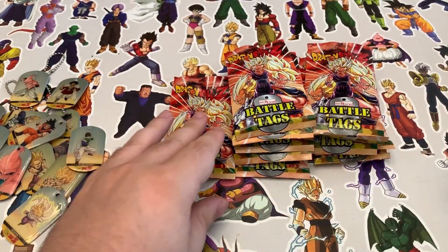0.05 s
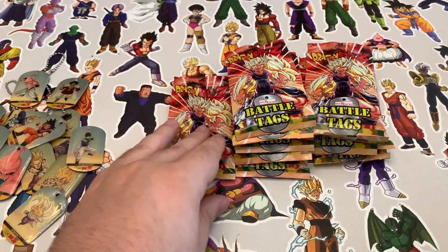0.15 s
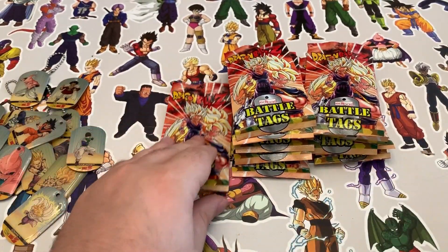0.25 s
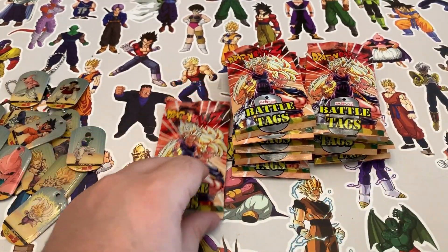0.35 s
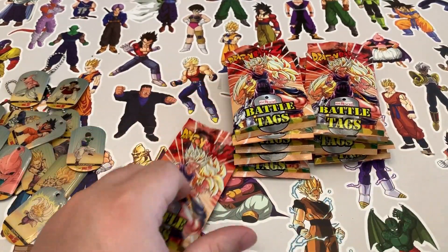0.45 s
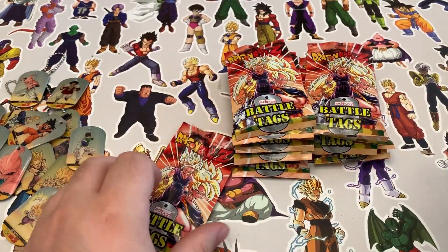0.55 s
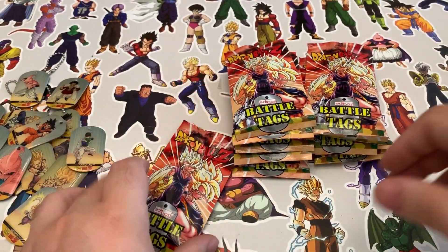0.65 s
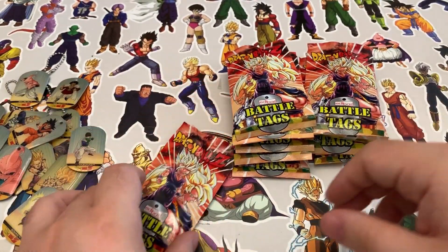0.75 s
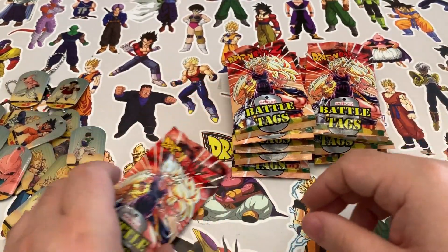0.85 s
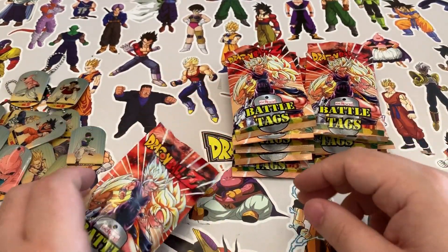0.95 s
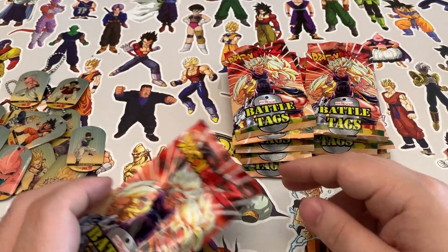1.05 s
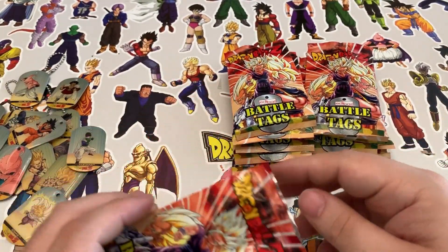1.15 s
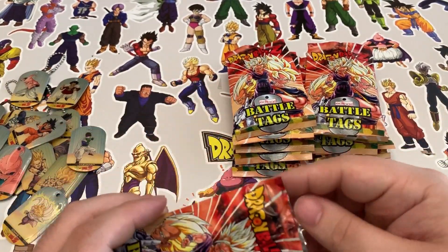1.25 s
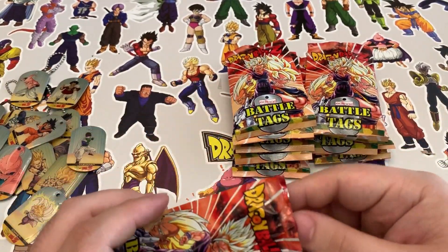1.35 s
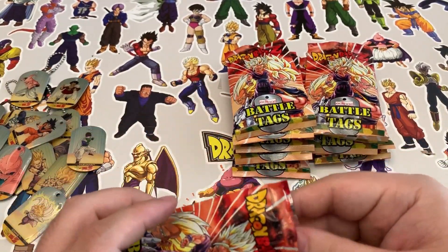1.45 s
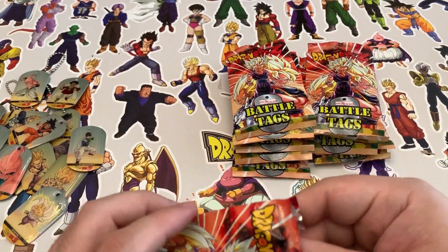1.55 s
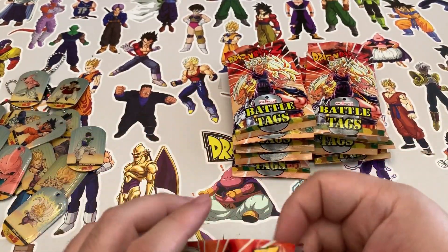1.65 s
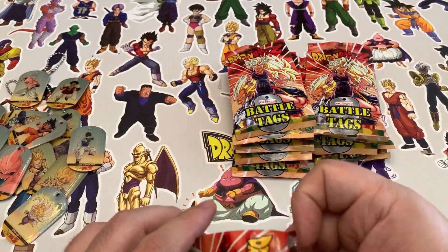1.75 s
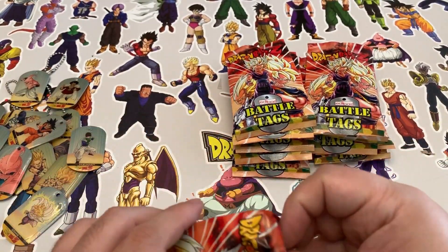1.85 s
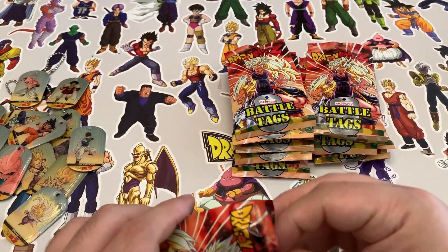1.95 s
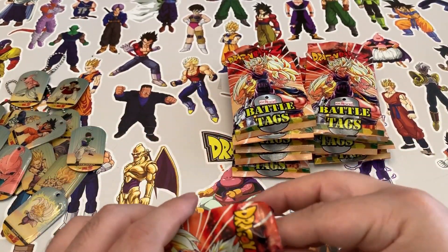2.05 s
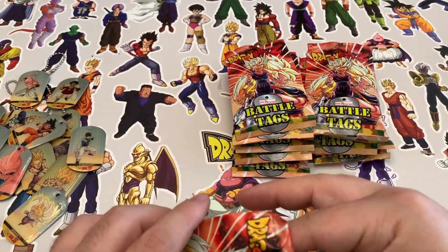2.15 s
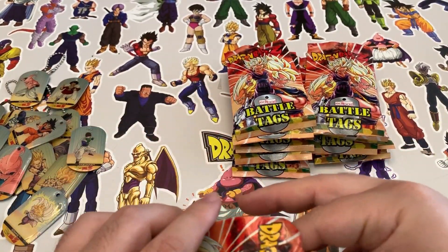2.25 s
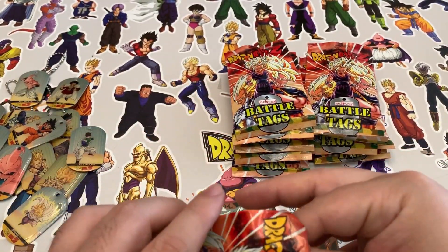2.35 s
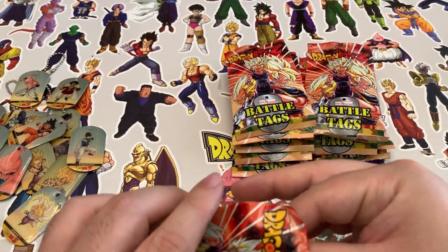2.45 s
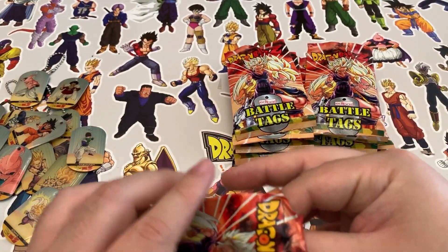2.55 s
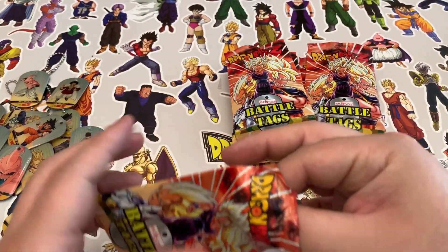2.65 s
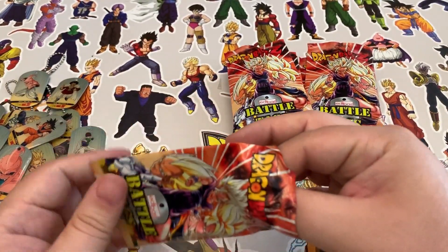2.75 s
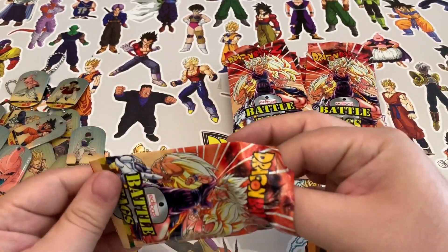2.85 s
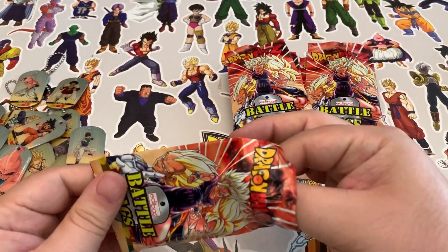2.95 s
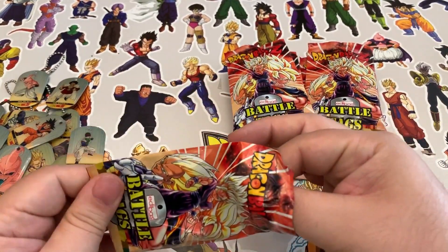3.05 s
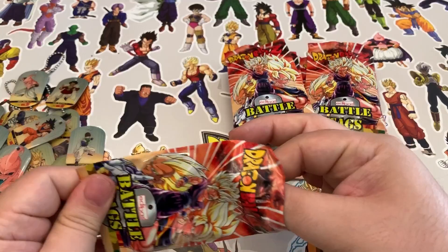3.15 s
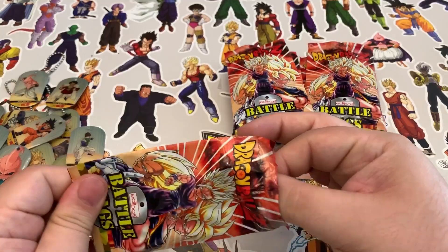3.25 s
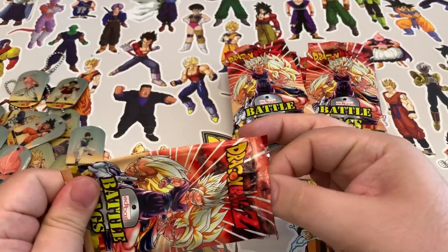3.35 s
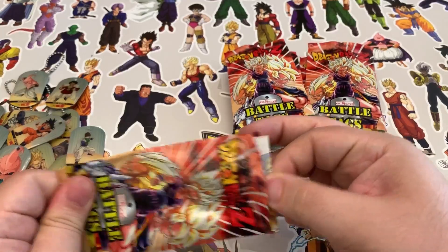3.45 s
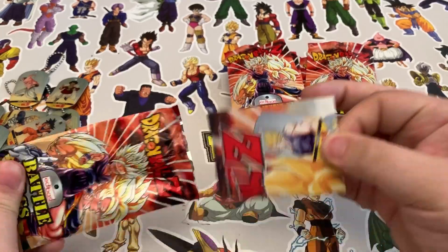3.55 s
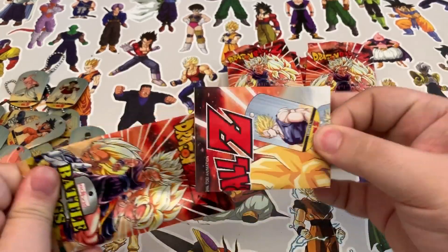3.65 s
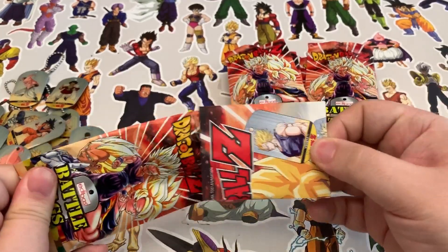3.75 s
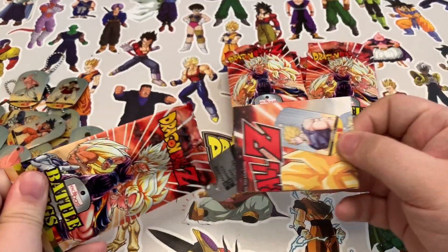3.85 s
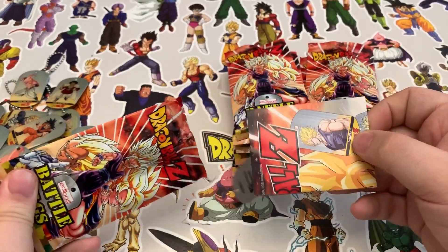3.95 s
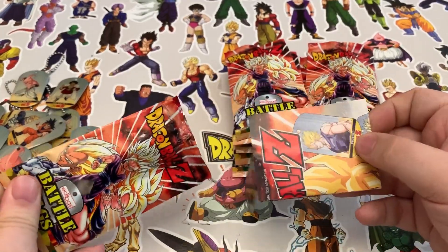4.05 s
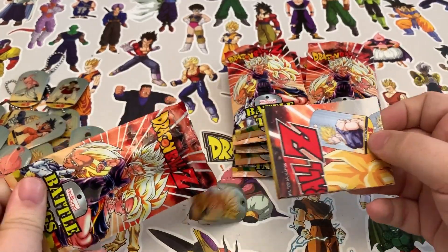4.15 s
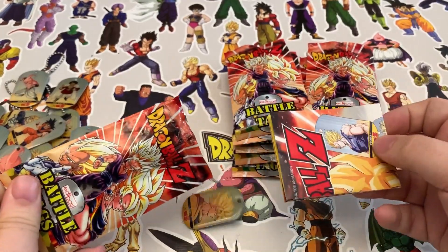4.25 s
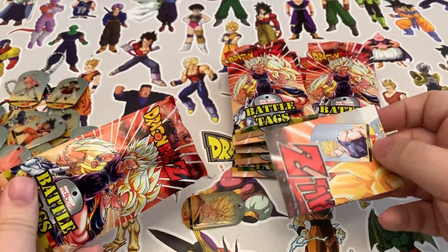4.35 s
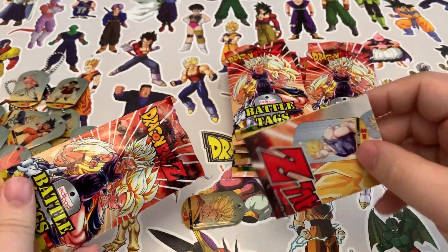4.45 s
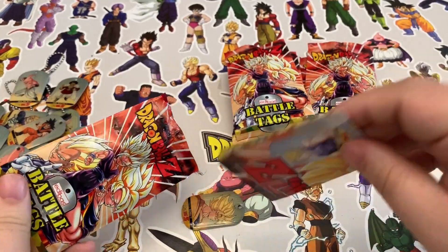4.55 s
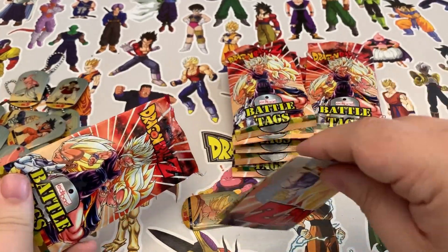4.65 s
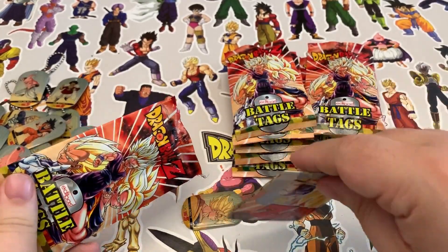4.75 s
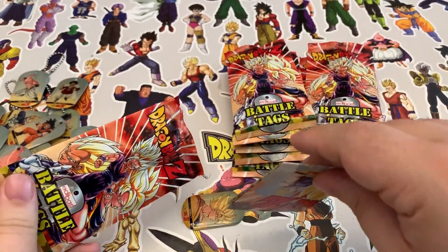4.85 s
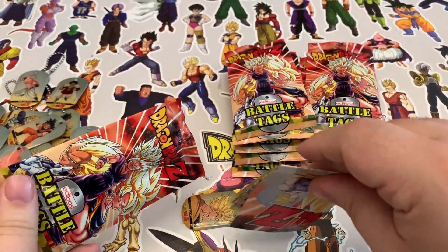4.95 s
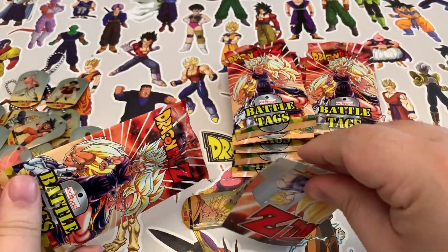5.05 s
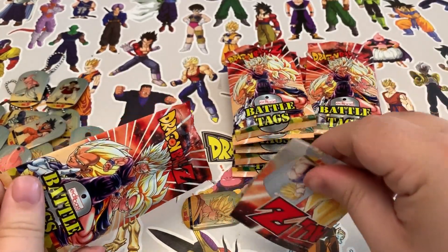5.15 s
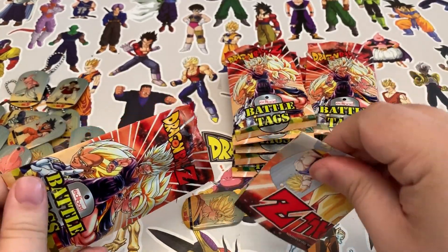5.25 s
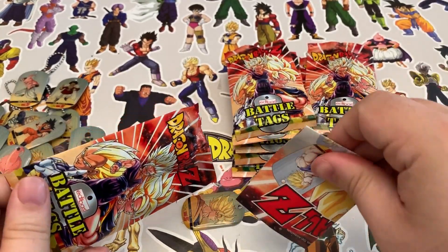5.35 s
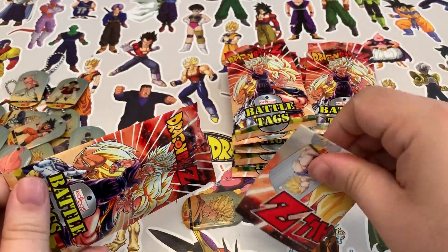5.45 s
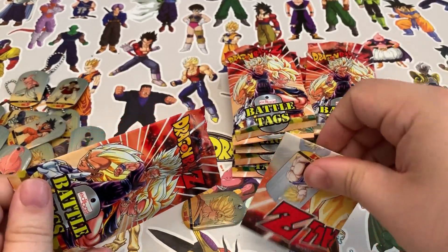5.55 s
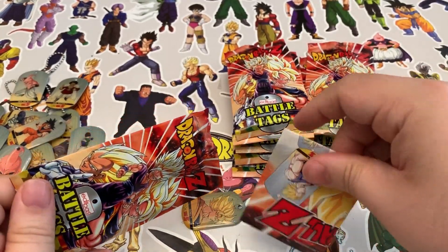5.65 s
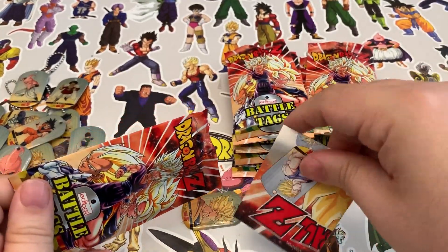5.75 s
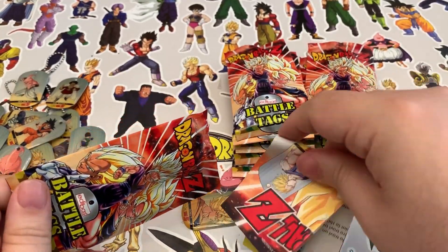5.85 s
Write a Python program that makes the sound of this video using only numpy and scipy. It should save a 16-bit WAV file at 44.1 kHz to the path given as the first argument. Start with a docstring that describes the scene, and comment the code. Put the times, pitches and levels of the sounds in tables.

```python
"""First a faint room tone and a whisper of foil, then soft bumps as a card pack is picked up just above a table.
Close to a pair of microphone ports in a small room, the foil is pinched and torn: creases crackle and snap.
The card taps and scuffs the table, a metal tag drops and bounces, then more taps, scuffs and a slide follow.
Snaps are short noise bursts with rings, crinkle is granular noise, the tag is mainly decaying sines,
and table blows are decaying bands of noise; a diffuse tail of noise gives the room."""
import sys
import numpy as np
from scipy import signal
from scipy.fft import rfft, irfft, next_fast_len
from scipy.io import wavfile
from scipy.ndimage import uniform_filter1d

SR = 44100
rng = np.random.default_rng(int(sys.argv[2]) if len(sys.argv) > 2 else 0)


def unload_audio(sound):
    """Save the sound as a 16-bit wav file, at the path given as the first command line argument."""
    columns = np.transpose(np.atleast_2d(sound))
    # keep every value between -1 and 1, then stretch to whole-number steps
    steps = np.round(np.clip(columns, -1, 1) * 32767)
    wavfile.write(sys.argv[1], SR, steps.astype(np.int16))


N = 260631
TIME = np.arange(N) / SR


def from_db(db):
    """Decibels to amplitude gain."""
    return 10 ** (np.asarray(db) / 20)


def rms_one(x):
    """Scale to unit rms."""
    return x / np.sqrt(np.mean(x ** 2) + 1e-20)


def at_hz(points, hz, axis=1):
    """Read a column of a table on a log-frequency axis."""
    points = np.array(points)
    return np.interp(np.log(hz), np.log(points[:, 0]), points[:, axis])


def curve(points):
    """Read a (t/s, level/dB) table along the whole scene, in dB."""
    return np.interp(TIME, *np.transpose(points))


def band(x, low, high):
    """Causal band-pass."""
    return signal.sosfilt(signal.butter(2, [low, high], "band", fs=SR, output="sos"), x + 1e-18)


def resonance(x, hz, width_hz):
    """One resonance with a gain of about one at its top."""
    r = np.exp(-np.pi * width_hz / SR)
    zeros = np.array([1, 0, -1]) * (1 - r * r) / 2
    return signal.lfilter(zeros, [1, -2 * r * np.cos(2 * np.pi * hz / SR), r * r], x)


def half_octaves():
    """Edges and centres of bands about half an octave wide."""
    edges = np.geomspace(24, 17500, 21)
    return zip(edges, edges[1:], np.sqrt(edges[1:] * edges[:-1]))


def drift(per_s):
    """Slow chance with a spread of one."""
    r = np.exp(-2 * np.pi * per_s / SR)
    wander = signal.lfilter([1], [1, -2 * r, r * r], rng.standard_normal(N + SR))
    return rms_one(wander[SR:])


def swell(s, length_s, attack_s, release_s):
    """One movement of the hand rises, holds and dies away."""
    before = np.maximum(s - TIME, 0) / attack_s
    after = np.maximum(TIME - s - length_s, 0) / release_s
    return np.exp(-np.minimum(before + after, 20))


def add(out, s, sound):
    """Mix a short sound in at time s."""
    start = max(round(s * SR), 0)
    out[..., start:start + sound.shape[-1]] += sound[..., :max(N - start, 0)]


# how alike the two ports sound: (f/Hz, likeness 0-1)
LIKENESS = [(60, .85), (500, .85), (1200, .68), (2500, .6), (4500, .55), (6500, .7), (8500, .97),
            (16000, .96)]


def two_ports(pair, hz):
    """Mix two unrelated signals into left and right, as alike as the ports are at this pitch."""
    alike = np.clip(at_hz(LIKENESS, hz), 0, 1)
    shared = np.sqrt((1 + alike) / 2) * pair[0]
    return shared + np.sqrt((1 - alike) / 2) * np.array([pair[1], -pair[1]])


def coloured(spectrum, envelope, patchy_db):
    """Stereo noise under an envelope, with a colour whose band levels wander independently; rms 1."""
    white, out = rng.standard_normal((2, 2, N)) * envelope, 0
    for k, (low, high, hz) in enumerate(half_octaves()):
        if spectrum[0][0] < high and low < spectrum[-1][0]:
            gain = from_db(at_hz(spectrum, hz) + patchy_db * drift(75))
            out = out + gain * two_ports(band(white[k % 2], low, high), hz)
    return rms_one(out)


def grains(per_s, spread_db, clump_db, grain_s, smooth):
    """Envelope of tiny buckles that come in clumps, over a share of smooth sliding."""
    born = rng.random(N) < per_s * from_db(clump_db * drift(25)) / SR
    sizes = from_db(spread_db * np.minimum(rng.exponential(1, N), 3))
    power = signal.lfilter([1], [1, -np.exp(-2 / (grain_s * SR))], (born * sizes) ** 2 + 1e-12)
    power = power / uniform_filter1d(power, size=4000)      # the fingers set the mean level
    return np.sqrt(np.abs(power) + abs(smooth))


def avalanche(t, lead_s, shock_db, shock_t60):
    """Clicks of one release: chance small slips before it and a dying, uneven train after, all weaker."""
    since = t - lead_s
    fade = from_db(shock_db - 60 * np.where(since > 0, since / shock_t60, -since / 0.02))
    uneven = from_db(6 * np.clip(rng.standard_normal(len(t)), -2, 1.5))
    slips = np.minimum((rng.random(len(t)) < 500 / SR) * fade * uneven, .5)
    slips[round(lead_s * SR)] = 1
    return slips


# every release also rings at a chance pitch in each zone
OTHER_MODES_DB, OTHER_MODES_T60_S = -1.5, 0.0045


def clicks(rows, zones, t60s, zone_db, ring_db, ring_t60, shock_db, shock_t60, rise_s):
    """Each release rings briefly and bursts in three zones, repeated by every slip of its avalanche."""
    out, t = np.zeros((2, N)), TIME[:SR // 10]
    lead_s, attack = .006, SR * 3 // 1000
    start, rise = round(lead_s * SR), 1 - np.exp(-t / rise_s)
    for s, *levels_db, ring_hz in rows:
        white = rng.standard_normal((3, 2, len(t)))
        slips = avalanche(t, lead_s, shock_db, shock_t60)
        swing = np.sin(2 * np.pi * ring_hz * t + rng.uniform(0, 2 * np.pi, (2, 1)))
        ring = np.roll(swing * rise * from_db(ring_db - 60 * t / ring_t60), start, axis=1)
        for k, (low, high) in enumerate(zones):
            decay = rise * from_db(-60 * t / t60s[k])
            power = signal.fftconvolve(slips ** 2, decay ** 2)[:len(t)]
            mode = np.sin(2 * np.pi * rng.uniform(low, high) * t)
            mode = mode * from_db(OTHER_MODES_DB - 60 * t / OTHER_MODES_T60_S)
            rings = ring + np.roll(mode, start) * [[1], [0]]    # chance pitch only in the shared signal
            burst = band(band(white[k] * np.sqrt(np.abs(power)) + rings, low, high), low, high)
            # unit rms over the first 3 ms after the release
            burst = burst / np.sqrt(np.mean(burst[:, start:start + attack] ** 2, axis=1, keepdims=True))
            gain = from_db(levels_db[k] + zone_db[k])
            add(out, s - lead_s - rise_s, gain * two_ports(burst, np.sqrt(low * high)))
    return out


# colour of the empty room: (f/Hz, relative level/dB per Hz)
ROOM_TONE = [(15, -34), (25, -3.5), (92, 5), (212, -1), (677, -26.5), (911, -18), (2990, -24),
             (7110, -26.5), (8590, -44), (11000, -22), (16000, -33)]
ROOM_TONE_DB = -73


def room_tone():
    """Steady noise of the place, its bands wandering slightly."""
    return from_db(ROOM_TONE_DB) * coloured(ROOM_TONE, 1, patchy_db=-0.5)


# the small room by band: (f/Hz, t60/s, echo level/dB)
ROOM = [(150, 0.94, -4.5), (397, 0.15, -8), (1230, 0.78, -5), (3170, 0.4, -6), (6740, 0.4, -9.5),
        (10600, 0.24, -17), (15000, .28, -15.5)]


def room(dry, gap_s, build_s):
    """Diffuse echoes swell after a short gap; each band dies away at its own rate."""
    t = TIME[:SR * 3 // 4]
    white, tail = rng.standard_normal((2, 2, len(t))), 0
    rise = 1 - np.exp(-np.maximum(t - gap_s, 0) / build_s)
    for k, (low, high, hz) in enumerate(half_octaves()):
        fade = rise * from_db(-60 * t / at_hz(ROOM, hz))
        fade = fade / np.linalg.norm(fade)
        level = from_db(at_hz(ROOM, hz, axis=2))
        tail = tail + level * two_ports(band(white[k % 2], low, high), hz) * fade
    return signal.fftconvolve(dry.mean(axis=0, keepdims=True), tail, axes=1)[:, :N]


# hands, pack and tag bumping the table: (t/s, peak level/dB before the layer trim, thud f/Hz)
BUMPS = [(0.301, -46, 320), (0.345, -39.5, 308), (0.383, -57, 72.7), (0.794, -53.5, 99.6),
         (0.818, -51, 88.8), (1.444, -47.5, 172), (2.262, -45, 330), (3.26, -36.5, 393), (3.302, -44, 358),
         (3.432, -39, 342), (3.573, -34, 345), (4.137, -43.5, 256), (4.305, -38, 237), (5.223, -44.5, 145),
         (5.275, -47.5, 94.2), (5.378, -38, 271), (5.85, -43, 191), (5.884, -42, 160)]


def table(t60, knock_db, knock_t60):
    """A soft blow thuds in the crowded low modes of the table top, with a short wooden knock."""
    out, t = np.zeros((2, N)), TIME[:SR // 3]
    for s, peak_db, hz in BUMPS:
        white = rng.standard_normal((2, 2, len(t)))
        thud = band(white[0] * from_db(-60 * t / t60), hz / 1.46, hz * 1.38)
        knock = band(white[1] * from_db(knock_db - 60 * t / knock_t60), 180, 420)
        sound = two_ports(thud + knock, hz)
        add(out, s, from_db(peak_db) * sound / np.abs(sound).max())
    return out


# card and fingers scuffing the table: (t/s, length/s, level/dB)
SCUFFS = [(4.139, .02, -40.5), (4.299, 0.052, -44.5), (5.375, 0.015, -48.5), (5.466, .38, -73.5),
          (5.853, .05, -61.5)]
# colour of the brushed table top: (f/Hz, relative level/dB per Hz)
SCUFF_COLOUR = [(88, -35), (150, -2.5), (325, -6), (480, -9.5), (720, -4.5), (1200, -3.5), (1800, -3),
                (2600, -9), (4300, -14.5), (7000, -23)]


def scuffs():
    """Card and fingers brush the table top with a dull, smooth rush."""
    level = 0
    for s, length_s, db in SCUFFS:
        level = level + from_db(db) * swell(s, length_s, attack_s=0.0025, release_s=0.039)
    return level * coloured(SCUFF_COLOUR, 1, patchy_db=-0.05)


# the card's edge sliding over the table: (t/s, level/dB)
SLIDE = [(5.45, -90), (5.55, -69.5), (5.72, -74), (5.84, -79), (5.88, -65), (5.91, -41.5)]
SLIDE_HZ, SLIDE_WIDTH_HZ = 4280, 480


def slide():
    """The sliding card hisses at one resonance, noise passed through it twice."""
    hiss = resonance(rng.standard_normal((2, N)), SLIDE_HZ, SLIDE_WIDTH_HZ)
    hiss = resonance(hiss, SLIDE_HZ, SLIDE_WIDTH_HZ)
    return from_db(curve(SLIDE)) * rms_one(two_ports(hiss, SLIDE_HZ))


# card and fingers tapping on table and pack:
# (t/s, body level/dB, crack level/dB, fizz level/dB, ring f/Hz), levels before the zone trims
TAPS = [(4.1355, -34, -25, -35, 2190), (4.5691, -51.5, -46.5, -73, 2460), (4.788, -74, -71, -84, 1372),
        (4.8738, -54, -39, -37.5, 4330), (5.0009, -86, -87, -53, 8700), (5.0442, -52, -55.5, -77, 1626),
        (5.2171, -59, -56.5, -52, 8900), (5.2686, -69, -54.5, -47.5, 9350),
        (5.3784, -46.5, -42.5, -63, 3040), (5.6282, -66, -76.5, -56.5, 8950), (5.903, -55, -45, -66, 3500)]
# body, crack and fizz zones of card: (low f/Hz, high f/Hz)
CARD_ZONES = [(450, 2000), (1800, 4800), (6000, 15000)]


def card_taps():
    """Card taps burst and ring in three zones, each with a train of weaker slips."""
    return clicks(TAPS, CARD_ZONES, t60s=[.012, .009, .007], zone_db=[-1.5, 0, .3], ring_db=4,
                  ring_t60=0.0044, shock_db=-10, shock_t60=0.13, rise_s=0.00065)


# the metal tag landing and bouncing: (t/s, level/dB before the layer trim)
TAG_HITS = [(4.305, -4), (4.3104, -3), (4.3145, -17.5), (4.3992, -26.5), (4.4026, -17.5), (4.408, -48)]
# ringing of the tag: (f/Hz, mean level/dB relative to the hit, t60/s)
TAG_MODES = [(4240, -9.5, .007), (5430, -5, .004), (6700, -21.5, .006), (7135, -4.5, 0.023),
             (7600, -6, 0.0058), (9900, -11, 0.006), (10450, -10, 0.015), (11220, -9, 0.016),
             (16100, -12.5, 0.007)]


def tag(scatter_db, crack_db, crack_t60):
    """Every landing gives a contact noise and rings each metal mode with a strength of its own."""
    out, t = np.zeros((2, N)), TIME[:SR // 8]
    for s, hit_db in TAG_HITS:
        contact = rng.standard_normal((2, len(t))) * from_db(crack_db - 60 * t / crack_t60)
        sound = 0.7 * two_ports(band(contact, 3800, 6830), 4500)
        sound = sound + two_ports(band(contact, 7330, 11000), 10000)
        for hz, db, t60 in TAG_MODES:
            swing = np.sin(2 * np.pi * hz * t + rng.uniform(0, 2 * np.pi, (2, 1)))
            strength_db = db + scatter_db * rng.standard_normal()
            sound = sound + two_ports(swing, hz) * from_db(strength_db - 60 * t / t60)
        add(out, s, from_db(hit_db) * sound)
    return out


# foil gliding over foil, a smooth swell: (t/s, length/s, level/dB before layer trims, brightness/dB)
GLIDES = [(0.008, 0.085, -81, 10), (0.397, 0.087, -67.5, 6), (0.52, 0.055, -57, 3.5), (1.07, 0.029, -59, 5),
          (1.272, 0.033, -47, -1.5), (1.444, 0.005, -49.5, 4), (1.529, .1, -55.5, 6.5),
          (1.721, 0.01, -54.5, 8), (2.006, 0.095, -47.5, 0.5), (3.743, 0.015, -30, -5),
          (3.802, .1, -50.5, 2.5)]
# colours of crackling creases and of hissing foil: (f/Hz, relative level/dB per Hz)
CRACKLE = [(1700, -18), (2800, -4.5), (4400, 3), (6300, -9), (8500, -8)]
FIZZ = [(5000, -14), (7500, -2), (10300, 1), (13000, -5), (16000, -5.5)]


def glides():
    """Foil gliding on foil: fine, nearly even hiss, its top set by the brightness of the stroke."""
    hiss = fizz = 0
    for s, length_s, db, bright_db in GLIDES:
        stroke = from_db(db) * swell(s, length_s, attack_s=0.017, release_s=0.022)
        hiss, fizz = hiss + stroke, fizz + from_db(bright_db) * stroke
    grain = grains(per_s=1000, spread_db=5.5, clump_db=6, grain_s=0.00049, smooth=0.71)
    middle = from_db(-2.5) * hiss * coloured(CRACKLE, grain, patchy_db=1.5)
    return middle + fizz * coloured(FIZZ, grain, patchy_db=2.0)


# low rubbing of the hands on pack and table: (t/s, level/dB)
RUBBING = [(0.0, -99), (0.28, -77), (0.37, -74), (0.7, -75), (0.85, -72), (1.3, -79), (1.6, -57.5),
           (1.8, -64.5), (2.05, -59.5), (2.42, -90), (2.7, -70.5), (3.15, -67.5), (3.78, -52),
           (4.08, -81.5), (4.5, -66.5), (4.7, -80.5), (5.18, -79.5), (5.4, -65.5)]
# how firmly the pack is held, as its steady rustle: (t/s, level/dB before the mix below)
GRIP = [(0.0, -89.5), (0.27, -89), (0.36, -70), (0.58, -57.5), (0.68, -81), (0.97, -60.5), (1.198, -81.5),
        (1.5, -54.5), (1.85, -65), (2.2, -58.5), (3.0, -66), (3.23, -58), (3.53, -69.5), (3.85, -55.5),
        (4.082, -74.5), (4.7, -99), (5.2, -81.5), (5.91, -72)]
# what the grip stirs up: (flexing level/dB, crackle level/dB, fizz level/dB)
GRIP_MIX = (0, -0.67, -6.5)
# the pack is pinched, pulled or torn: (t/s, length/s, level/dB before the mix below, brightness/dB)
CRUMPLES = [(0.297, .02, -57.5, -6), (0.341, .025, -46, -9.5), (0.782, .05, -59, -13),
            (0.851, .06, -55.5, -6.5), (0.937, .03, -64, 5.5), (1.446, 0.0073, -42, -0.5),
            (1.587, .07, -57, -23), (1.706, .035, -52.5, -54), (1.904, .08, -51.5, -6.5),
            (2.174, .13, -46.5, -9.5), (2.257, .02, -35, -30), (2.331, .04, -46.5, -2),
            (2.462, .02, -71.5, 12), (2.534, .07, -57, -3), (2.623, .025, -49.5, -2),
            (2.776, .05, -63, 1.5), (2.859, 0.029, -56.5, 2), (3.26, .04, -37.5, -5),
            (3.304, .018, -32.5, -3.5), (3.426, 0.02, -34.5, -0.5), (3.573, .025, -29.5, -6),
            (3.597, 0.048, -40.5, 1.5), (3.734, .08, -46.5, -2), (3.961, .02, -59.5, -1),
            (4.177, 0.0056, -58.5, 3.5), (5.898, .02, -52, -5.5)]
# what a pinch or pull stirs up: (rubbing level/dB, flexing level/dB, crackle level/dB, fizz level/dB)
CRUMPLE_MIX = (-18.5, -3, -0.5, 3.5)
FLEX_DB_PER_BRIGHT_DB = 0.39   # a brighter movement also flexes the sheet more


def finger_work():
    """The steady grip and every pinch add in power: rms of rubbing, flexing, crackle and fizz."""
    grip_db = curve(GRIP)
    power = from_db([curve(RUBBING), *(grip_db + db for db in GRIP_MIX)]) ** 2
    for s, length_s, db, bright_db in CRUMPLES:
        tilt_db = bright_db * np.array([0, FLEX_DB_PER_BRIGHT_DB, 0, 1])
        gains = from_db(db + np.array(CRUMPLE_MIX) + tilt_db)
        power += np.outer(gains ** 2, swell(s, length_s, attack_s=0.0064, release_s=.014) ** 2)
    return np.sqrt(power)


# colours of rubbing hands and of the flexing sheet: (f/Hz, relative level/dB per Hz)
RUB = [(18, -32.5), (30, -9), (49, 1), (151, 0.5), (192, -0.5), (346, 5), (536, -20), (600, -6.5),
       (780, -30), (1320, -120)]
FLEX = [(400, -8.5), (620, -8.5), (900, -5.5), (1500, -1), (2300, -3), (3200, -17)]


def handling(work):
    """Fingers rub the pack, the sheet buckles dully, its creases crackle and sliding foil hisses evenly."""
    buckles = grains(per_s=260, spread_db=3.0, clump_db=4, grain_s=0.0017, smooth=.06)
    fine = grains(per_s=650, spread_db=3.0, clump_db=3.0, grain_s=0.0015, smooth=0.1)
    creases = np.hypot(buckles, 1.8 * fine)
    strokes = grains(per_s=170, spread_db=10.0, clump_db=6, grain_s=0.011, smooth=0.54)
    rub = coloured(RUB, strokes, patchy_db=-0.5)
    flex = coloured(FLEX, buckles, patchy_db=2.0)
    crackle = coloured(CRACKLE, np.hypot(creases, .6), patchy_db=3.0)
    fizz = coloured(FIZZ, np.hypot(creases, 1.3), patchy_db=5.0)
    return sum(level * layer for level, layer in zip(work, (rub, flex, crackle, fizz)))


# lesser creases let go at random; mean level over the crinkle, its scatter and its ceiling, before zone trims
SMALL_SNAPS_PER_S, SMALL_SNAP_DB, SMALL_SNAP_SCATTER_DB, SMALL_SNAP_TOP_DB = 22, 6.5, 4, -41.5


def small_snaps(work):
    """Rows of chance snaps whose strength follows the fingers; each facet has a pitch of its own."""
    chance, scatter = rng.random((300, 3)), rng.standard_normal((300, 3))
    at = (chance[:, 0] * N).astype(int)
    work_db = 20 * np.log10(work[1:, at].T)
    levels_db = work_db + SMALL_SNAP_DB + SMALL_SNAP_SCATTER_DB * scatter
    ring_hz = 900 * (11000 / 900) ** chance[:, 1]
    rows = np.column_stack([at / SR, np.minimum(levels_db, SMALL_SNAP_TOP_DB), ring_hz])
    return rows[chance[:, 2] < SMALL_SNAPS_PER_S * N / SR / len(chance)]


# the loudest creases snapping and the seam giving way:
# (t/s, body level/dB, crack level/dB, fizz level/dB, facet ring f/Hz), levels before the zone trims
SNAPS = [(0.3457, -44.5, -43.5, -49, 2200), (0.8598, -46, -38.5, -43, 9170),
         (0.8914, -59, -39.5, -49, 4050), (0.9493, -77, -34.5, -34, 9170), (1.073, -75, -45, -32.5, 9970),
         (1.0879, -60, -52.5, -43, 10290), (1.3474, -51, -49, -55, 6860), (1.4466, -45, -38, -34, 8380),
         (1.4631, -42, -30, -33, 2840), (1.5555, -41.5, -37, -32.5, 10470), (1.63, -38.5, -37, -38, 9930),
         (1.6537, -41, -42, -48, 990), (1.6637, -36, -50, -41, 7800), (1.7234, -44, -63, -33, 11050),
         (1.7558, -47, -35, -35, 8810), (1.9577, -42.5, -38.5, -39, 2670), (1.967, -33, -50, -34, 9630),
         (2.0743, -41.5, -34.5, -33, 8940), (2.1707, -47, -34.5, -30, 9910), (2.203, -36.5, -54, -57, 1010),
         (2.2371, -35, -55, -55, 2000), (2.2526, -32, -32, -52, 2070), (2.264, -41.5, -27.5, -28, 2800),
         (2.3009, -48.5, -39.5, -40.5, 10120), (2.3407, -29, -23, -24, 2760), (2.3452, -39, -42, -41, 9500),
         (2.3571, -34, -28.5, -26.5, 9910), (2.3698, -42, -58.5, -27.5, 9950),
         (2.3837, -34, -29, -29, 2070), (2.4655, -41.5, -78, -36, 1000), (2.5556, -40.5, -48, -38, 10640),
         (2.6478, -36.5, -32, -25, 9040), (2.6927, -51.5, -45.5, -35.5, 10980),
         (2.7211, -40.5, -41.5, -35.5, 7820), (2.7655, -37.5, -36, -33, 9990),
         (2.8826, -53.5, -33.5, -32, 10340), (2.928, -53.5, -39, -45.5, 3920),
         (3.0166, -59, -48, -47.5, 8350), (3.085, -54.5, -48, -59, 3900), (3.1305, -44, -37, -41, 4740),
         (3.1632, -43.5, -58, -65, 892), (3.2463, -39, -37.5, -36.5, 2670), (3.2616, -30, -21, -18, 10340),
         (3.302, -29.5, -19.5, -17.5, 5820), (3.318, -32.5, -24, -30, 6500),
         (3.4134, -37.5, -35.5, -39, 4346), (3.4304, -33.5, -27.5, -25.5, 10750),
         (3.4389, -37.5, -20, -22, 4440), (3.4759, -44.5, -29.5, -28, 10030),
         (3.5748, -17.5, -16.5, -16.5, 907), (3.579, -23, -20, -21.5, 5570),
         (3.5846, -39.5, -16.5, -28.5, 7770), (3.6787, -40.5, -29.5, -40, 4370),
         (3.7329, -43.5, -31.5, -36, 9150), (3.749, -38, -32, -28.5, 10360),
         (3.7731, -37.5, -39.5, -29, 9190), (3.8029, -41, -30.5, -31, 10310), (3.835, -41, -46, -32, 10420),
         (4.0197, -42.5, -42.5, -72, 1890)]
# body, crack and fizz zones of foil: (low f/Hz, high f/Hz)
FOIL_ZONES = [(450, 2200), (2000, 7000), (7500, 16000)]


def foil_snaps(work):
    """Creases and seam let go in sharp bursts, each ringing its facet and setting off weaker slips."""
    return clicks([*SNAPS, *small_snaps(work)], FOIL_ZONES, t60s=[.011, .0065, .0045],
                  zone_db=[-3, -1.2, -.7], ring_db=0.5, ring_t60=0.0075,
                  shock_db=-12.0, shock_t60=0.067, rise_s=.0003)


# lifted and dipped bands, laid on the close foil sounds; the treble also dips broadly near 13.4 kHz: (f/Hz,
# width/Hz, lift # level/dB)
FOIL_TONE = [(372, 81, 1.5), (553, 140, -6.5), (885, 250, 3.5), (1070, 170, -0.5), (1440, 320, -3),
             (2790, 130, 3), (4345, 570, 1.5), (9700, 670, 1.5), (13440, 1500, -4)]


def foil_tone(x):
    """Lift some bands of every crinkle and dip others."""
    return x + sum((from_db(db) - 1) * resonance(x, hz, width_hz) for hz, width_hz, db in FOIL_TONE)


# level/dB of each source sent to the room; the pack is held close to the ports
FOIL_ROOM_DB, TAG_ROOM_DB, CARD_ROOM_DB, TABLE_ROOM_DB = -2.5, 1, -5.5, 0


def scene():
    """Table, card, tag and foil in the room over its tone; the card's taps are driest."""
    floor = room_tone()
    thuds = from_db(-1.5) * table(t60=0.18, knock_db=-7.5, knock_t60=0.0097)
    wood = thuds + scuffs()
    card = card_taps()
    metal = from_db(-3.0) * tag(scatter_db=0.5, crack_db=3.5, crack_t60=0.0086)
    work = finger_work()
    crinkle = handling(work) + glides()
    near = foil_tone(foil_snaps(work) + crinkle) + slide()
    sent = from_db(FOIL_ROOM_DB) * near + from_db(TAG_ROOM_DB) * metal
    sent = sent + from_db(CARD_ROOM_DB) * card + from_db(TABLE_ROOM_DB) * wood
    echoes = room(sent, gap_s=0.0012, build_s=0.0013)
    return near + card + metal + wood + echoes + floor


# the microphone ports: (f/Hz, phase lead of the left/rad, left minus right level/dB)
PORTS = [(20, 0, 0), (450, .15, .5), (850, .35, 4.5), (1200, .8, 2.5), (1500, 1.2, 1.5), (2400, 2.0, .5),
         (3600, 2.9, -1.5), (5500, 2.7, -4), (6400, 0, -1), (7200, -1.5, 0), (8500, -3.14, 0),
         (13500, -9.42, 0), (16000, -12.9, 0)]
CUTOFF_HZ = 16000


def record(dry):
    """The two close ports differ in phase and level with pitch; the top is cut."""
    size = next_fast_len(N + SR // 10)
    hz = np.arange(size // 2 + 1) * SR / size
    port_hz, lead_points, tilt_points = np.array(PORTS).T
    lead = np.interp(hz, port_hz, lead_points)
    tilt_db = np.interp(hz, port_hz, tilt_points)
    left = from_db(tilt_db / 2) * np.exp(1j * lead / 2)
    heard = irfft(rfft(dry, size) * np.array([left, 1 / left]), size)[:, :N]
    return signal.sosfilt(signal.ellip(8, .3, 70, CUTOFF_HZ, fs=SR, output="sos"), heard)


dry = scene()
out = record(dry)
unload_audio(out)
```